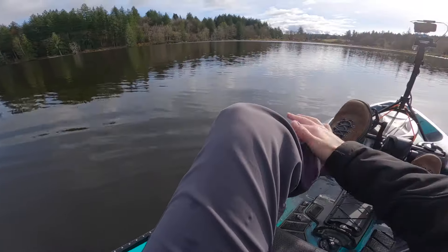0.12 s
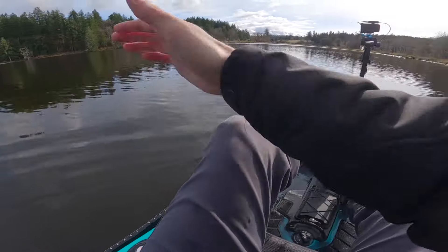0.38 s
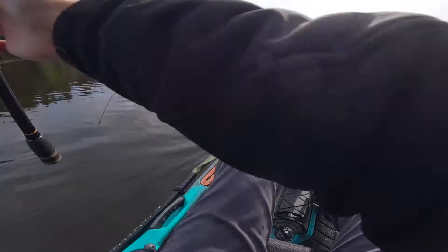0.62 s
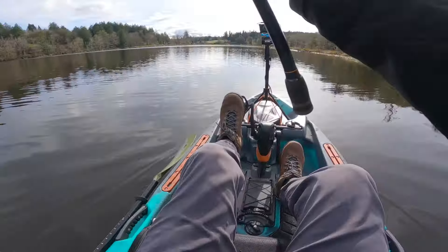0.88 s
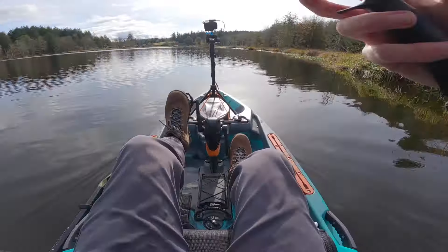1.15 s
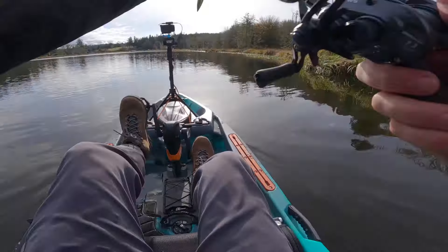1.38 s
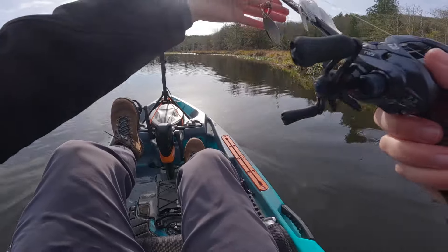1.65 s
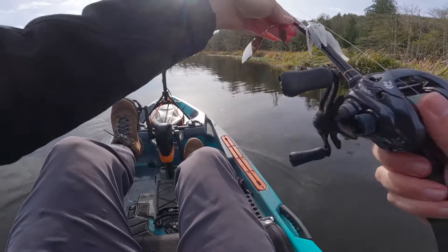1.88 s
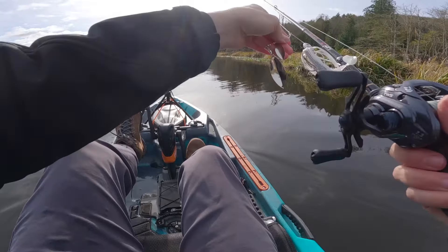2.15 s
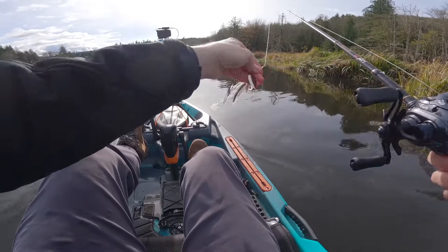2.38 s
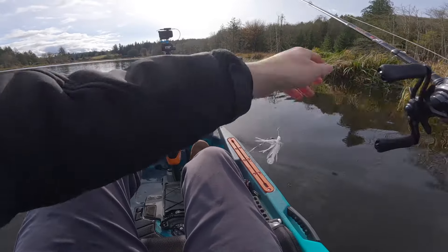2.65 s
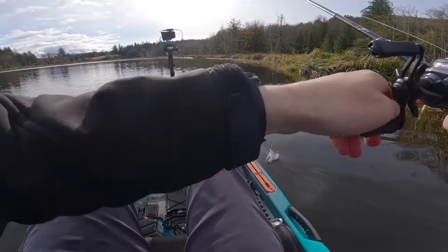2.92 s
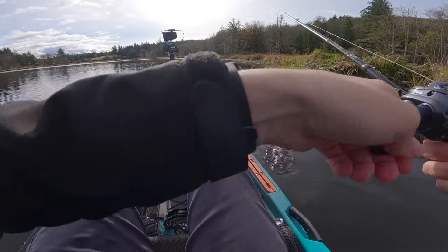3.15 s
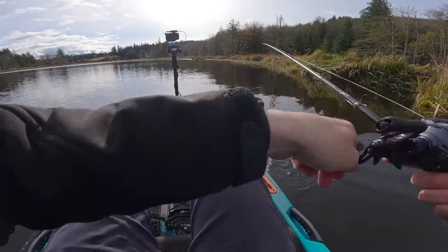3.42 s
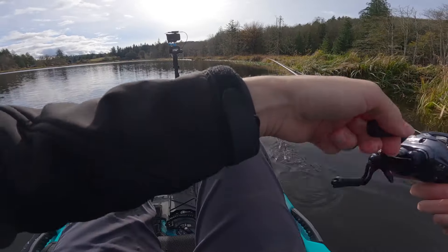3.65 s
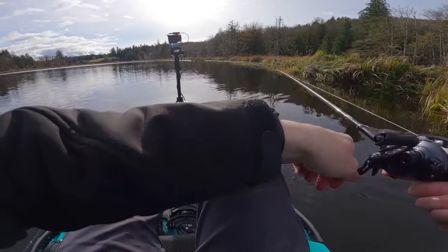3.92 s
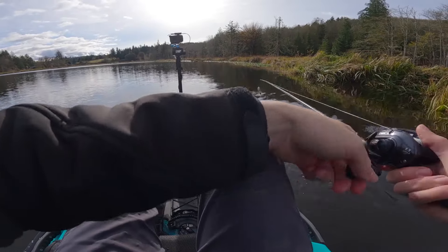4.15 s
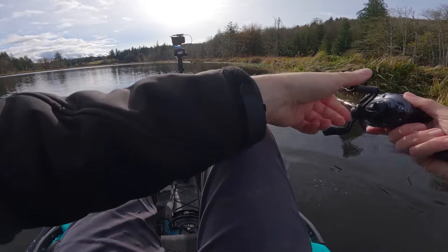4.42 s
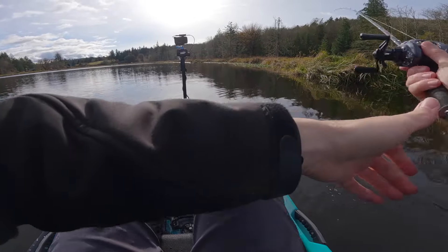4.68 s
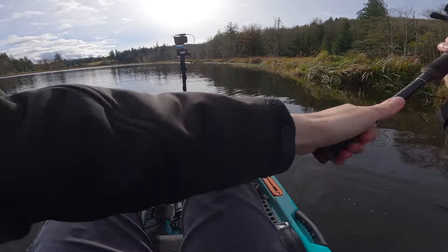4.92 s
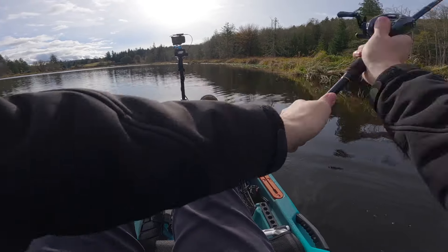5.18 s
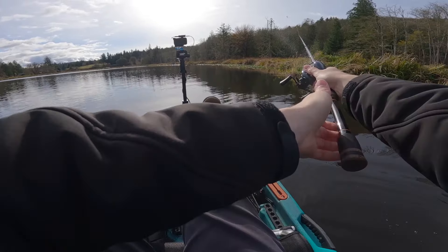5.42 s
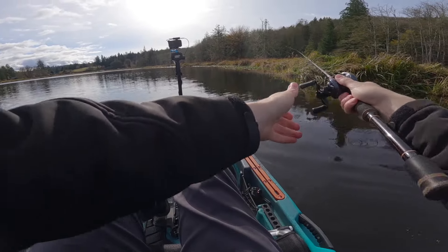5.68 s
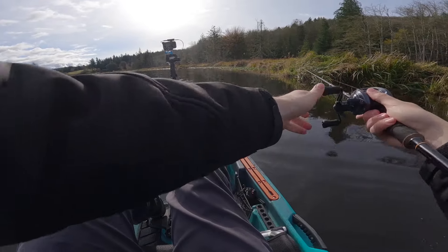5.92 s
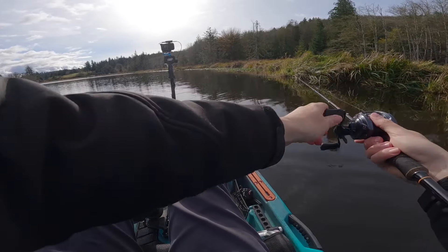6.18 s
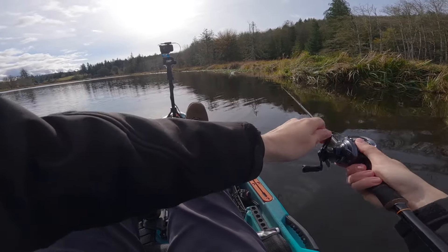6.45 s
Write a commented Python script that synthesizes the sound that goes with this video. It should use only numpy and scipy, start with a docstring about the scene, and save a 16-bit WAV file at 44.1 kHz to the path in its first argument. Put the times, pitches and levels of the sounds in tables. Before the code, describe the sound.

A quiet open lake, close and dry from the chest, centred, with barely audible air. Soft hollow knocks at 0-0.4 s accompany faint blade tinkles; sleeve rustle and low hull rumble surge from 0.25 to 1.6 s, with a soft low hum from 0.65 s and a light reel whirr near 1.2. At 1.72 a thin bright blade rings, then a very sharp clack at 1.92. Sparse delicate tinkles follow at 2.1-2.8. From 3.03 to 3.25 clicks, rattle and knocks crowd together, the loudest snap at 3.22; grainy winding whirr swells around 3.3 and 3.6, with a faint high squeal and dull handle knocks to 4.4. A brief scrape, a solid clack at 4.55 and bright jingles at 4.65-4.73 lead to a sleeve swish peaking at 5.2-5.4. Spool whirr swells at 5.55, a faint ring at 5.8, then it fades into light rustle and small clicks near 6.4.

```python
"""Soft knocks on rod and hull, then rubbing jacket sleeves and clicks: an angler in a kayak on a still lake
frees a bladed lure, winds in and casts again, heard from the chest. Sleeves and lake air are coloured noise,
the hum and the squeal of line are wavering sines; scraping noise rings the reel housing as a whirr.
Contact noise rings the reel body in clicks, handle turns knock hull modes, and
the lure's two thin blades tinkle as decaying plate modes."""
import sys
import numpy as np
from scipy import signal
from scipy.fft import rfft, irfft, next_fast_len
from scipy.io import wavfile
from scipy.ndimage import uniform_filter1d

SR = 44100
rng = np.random.default_rng(int(sys.argv[2]) if len(sys.argv) > 2 else 0)


def put_to_file(sound):
    """Save the sound as 16-bit audio at rate SR, in the file named by the first command-line argument."""
    columns = np.atleast_2d(sound).T  # one column per channel
    safe = np.clip(columns, -1, 1)
    whole_steps = np.round(safe * 32767)
    wavfile.write(sys.argv[1], SR, whole_steps.astype(np.int16))


def volts_from_decibels(level):
    """Turn decibel levels (scalar or array-like) into linear amplitude factors."""
    exponent = np.asarray(level, float) / 20
    return 10 ** exponent


N = 289365
LOG_60_DB = np.log(1000)


def curve(table):
    """Columns of a table joined by straight lines in time."""
    s, *columns = np.transpose(table)
    return [np.interp(np.arange(N) / SR, s, c) for c in columns]


def level(x, db):
    """Unit rms, then a gain in dB."""
    return x * volts_from_decibels(db) / np.sqrt(np.mean(x ** 2))


def walk(rate_hz):
    """Random levels held 1 / rate_hz seconds and slewed twice; spread near 2."""
    hold = int(SR / rate_hz)
    steps = np.repeat(rng.standard_normal(N // hold + 1), hold)
    return 2.52 * uniform_filter1d(uniform_filter1d(steps, hold), hold)[:N]


def decay(t, t60_s):
    """Exponential decay by 60 dB in t60_s."""
    return np.exp(-LOG_60_DB * t / t60_s)


def peaks(hz, table):
    """Complex response of a sum of resonances."""
    return sum(volts_from_decibels(db) * 1j * hz * w / (f ** 2 - hz ** 2 + 1j * hz * w) for f, w, db in table)


def hiss(points, flicker_db, rate_hz, grain_db):
    """Coloured grainy noise of unit rms in octave bands, each of which flickers on its own."""
    hz = np.arange(N // 2 + 1) * SR / N + 1
    point_hz, point_db = np.transpose(points)
    colour = volts_from_decibels(np.interp(np.log(hz), np.log(point_hz), point_db))
    grain = volts_from_decibels(grain_db * np.minimum(rng.exponential(size=N), 6))
    spectrum = rfft(rng.standard_normal(N) * grain) * colour
    octave = np.log2(hz / 20)
    out = np.zeros(N)
    for k in range(11):
        window = np.cos(np.pi / 2 * np.clip(octave - k, -1, 1)) ** 2
        out += irfft(spectrum * window, N) * volts_from_decibels(flicker_db * walk(rate_hz))
    return level(out, 0)


def tone(table, waver_db, rate_hz):
    """A sine that follows a pitch and rms level table with a wavering level, silent outside it."""
    hz, db = curve(table)
    t = np.arange(N) / SR
    on = np.clip(np.minimum(t - table[0][0], table[-1][0] - t) / 0.024, 0, 1)
    gain = np.sqrt(2) * on * volts_from_decibels(db + waver_db * walk(rate_hz))
    return gain * np.sin(2 * np.pi * np.cumsum(hz) / SR)


def swells(s, db, rise_s, fall_s):
    """Gain that climbs to peaks and dies away at steady rates, 20 dB per rise or fall, summed by power."""
    late = np.arange(N) / SR - np.array(s)[:, None]
    below = 20 * np.maximum(late / np.array(fall_s)[:, None], -late / np.array(rise_s)[:, None])
    return np.sqrt((volts_from_decibels(np.array(db)[:, None] - below) ** 2).sum(axis=0))


def whirr(modes):
    """Uneven scraping rings a housing; the grip shifts which resonances sound and bends them a little."""
    roughness_db = 3.0 * np.minimum(rng.exponential(size=N), 4) + 1.5 * walk(120)
    scrape = rfft(rng.standard_normal(N) * volts_from_decibels(roughness_db))
    hz, out = np.arange(N // 2 + 1) * SR / N, np.zeros(N)
    for f, w, db in modes:
        mode = irfft(scrape * peaks(hz, [(f, w, 0)]) ** 2, N)
        ring = signal.hilbert(mode, next_fast_len(N))[:N]
        bend_hz, grip_db = .008 * min(f, 5000) * walk(5), .8 * walk(18)
        out += volts_from_decibels(db + grip_db) * np.real(ring * np.exp(2j * np.pi * np.cumsum(bend_hz) / SR))
    return level(out, 0)


def add(out, s, sound, db):
    """Mix a sound in at time s with its peak at db."""
    i = int(s * SR)
    out[i:i + len(sound)] += (sound * volts_from_decibels(db) / np.abs(sound).max())[:N - i]


# Noise colour of lake air. Each row: frequency in Hz, relative level in dB.
AIR_COLOUR = [(24, -43.5), (40, -1), (123, 5), (260, -12), (388, -11), (1530, -25), (5070, -45),
              (6190, -25.5), (15600, -26.5)]


def lake_air():
    """Faint, slowly flickering broadband noise."""
    return volts_from_decibels(-60) * hiss(AIR_COLOUR, flicker_db=.5, rate_hz=8, grain_db=.1)


# Low tone. Each row: time in seconds, pitch in Hz, rms level in dB.
HUM_TRACK = [(.63, 121.9, -59), (.7, 179.6, -46.5), (.75, 153, -48), (.8, 141.1, -57), (1.05, 147, -56),
             (1.6, 143.9, -55), (2.25, 140.9, -60.5), (2.35, 140, -69), (2.6, 138.2, -79)]
# Low thud under its first swell. Each row: time in seconds, pitch in Hz, rms level in dB.
THUD_TRACK = [(.65, 80, -62), (.72, 87, -51.5), (.79, 96, -63)]


def hum():
    """A soft low sine that swells once, holds and fades, with a thud below it."""
    return tone(HUM_TRACK, waver_db=.8, rate_hz=10) + tone(THUD_TRACK, waver_db=.8, rate_hz=10)


# Line on a guide. Each row: time in seconds, pitch in Hz, rms level in dB.
SQUEAL_TRACK = [(3.3, 11980, -74), (3.426, 13400, -68), (3.56, 13782, -72)]


def line_squeal():
    """A thin rising sine, the faint squeal of running line on a guide."""
    return tone(SQUEAL_TRACK, waver_db=1.5, rate_hz=60)


# The angler's movement. Each row: time in seconds, sleeve rub level in dB, hull rumble level in dB.
MOVEMENT = [(0, -63.5, -53), (.22, -54.5, -50), (.245, -48, -62), (.5, -42, -51), (.64, -43, -47.5),
            (1.03, -42.5, -52.5), (1.2, -47, -48.5), (1.62, -48.5, -54.5), (1.73, -58.5, -59.5),
            (2.1, -59.5, -63.5), (2.97, -63, -65), (3.25, -57.5, -53.5), (4.02, -68, -61.5),
            (4.5, -68, -54), (5.1, -55.5, -60), (5.3, -60, -54.5), (5.5, -51, -55.5), (6.25, -62.5, -62)]


def movement():
    """Gains of sleeve rub and hull rumble as the body moves."""
    return [volts_from_decibels(db) for db in curve(MOVEMENT)]


# Noise colour of the hull. Each row: frequency in Hz, relative level in dB.
RUMBLE_COLOUR = [(30, -50), (70, -7), (200, 0.5), (400, -1.5), (700, -15), (1400, -40)]


def hull_rumble():
    """Shifting weight rumbles through the hull as low noise."""
    _, hull_gain = movement()
    return hull_gain * hiss(RUMBLE_COLOUR, flicker_db=2.0, rate_hz=31, grain_db=1.0)


# Pushes on the reel. Each row: peak time in seconds, whirr level in dB, rise and fall in seconds per 20 dB.
REEL_PUSHES = [(1.22, -55.5, 0.09, 0.52), (3.3, -51, 0.098, 2), (3.62, -51.5, 0.31, 0.39),
               (4.01, -64, 0.072, 0.35), (4.278, -57.5, 0.1, 0.47), (5.56, -52.5, 0.42, 0.55),
               (5.9, -58, 0.36, 0.88)]


def reel_drive():
    """Whirr gain: each push swells the reel, which then runs down."""
    return swells(*np.transpose(REEL_PUSHES))


# Dull rub of sleeves and line. Each row: frequency in Hz, relative level in dB.
RUB_COLOUR = [(200, -0.5), (500, 5.5), (1200, 2), (2500, 1), (4500, -1), (7000, -12), (12000, -37)]
# Fine hiss of sleeves. Each row: frequency in Hz, relative level in dB.
FINE_COLOUR = [(2000, -11.5), (4000, -4), (8000, 0.5), (12000, -2.5), (16000, -6)]
# Quick arm sweeps. Each row: peak time in seconds, rub level in dB, fine hiss level in dB,
# rise and fall in seconds per 20 dB.
ARM_SWEEPS = [(2.5, -66, -53.5, 0.25, 0.093), (3.09, -54.5, -54.5, 0.22, 0.045),
              (4.91, -63.5, -56.5, 0.15, 0.1), (5.22, -44, -46.5, 0.2, 0.12),
              (5.363, -39.5, -40.5, 0.1, 0.13), (6.42, -54.5, -58, 0.12, 0.11)]


def sleeves_and_line():
    """Sleeves, line and handle rub dully; sleeves also hiss finely."""
    slow, _ = movement()
    s, rub_db, fine_db, rise_s, fall_s = np.transpose(ARM_SWEEPS)
    line = volts_from_decibels(-4.5) * reel_drive()
    rub_gain = np.sqrt(slow ** 2 + line ** 2 + swells(s, rub_db, rise_s, fall_s) ** 2)
    fine_gain = np.hypot(volts_from_decibels(-2.5) * slow, swells(s, fine_db, rise_s, fall_s))
    rub = rub_gain * hiss(RUB_COLOUR, flicker_db=0.83, rate_hz=30, grain_db=1.5)
    return rub + fine_gain * hiss(FINE_COLOUR, flicker_db=1.05, rate_hz=43, grain_db=3.0)


# Drag resonances. Each row: frequency in Hz, width in Hz, relative level in dB.
DRAG_MODES = [(657, 520, -1), (1290, 97, -2)]
# One entry: start in seconds, end in seconds, rms level in dB.
DRAG_TIME = (4.4, 4.545, -59)


def drag():
    """A dull scrape before the spool is freed."""
    t = np.arange(N) / SR
    start_s, end_s, db = DRAG_TIME
    fade = np.clip(np.minimum(t - start_s, end_s - t) / 0.014, 0, 1)
    return volts_from_decibels(db) * fade * whirr(DRAG_MODES)


# Housing at first. Each row: frequency in Hz, width in Hz, relative level in dB.
GEAR_MODES = [(2250, 380, 7), (3200, 700, 2), (4290, 710, 1.5), (5300, 560, 0)]
# Housing once the handle turns steadily. Each row: frequency in Hz, width in Hz, relative level in dB.
LOADED_MODES = [(2090, 320, 7), (2710, 440, 4), (3460, 410, -0.5), (5270, 480, -1.5)]
# Free-running once the spool is released. Each row: frequency in Hz, width in Hz, relative level in dB.
SPOOL_MODES = [(620, 580, 4), (1335, 110, 5), (2050, 470, -2.5), (3050, 240, 5), (2560, 170, 4),
               (4250, 310, -2), (4960, 420, 3.5), (13400, 600, -4), (15000, 770, -5)]


def reel_whirr():
    """Gear teeth scrape the housing while winding; spool and line run from the spool's release on."""
    t = np.arange(N) / SR
    loaded_s, release_s = 3.55, 4.6
    winding = [whirr(GEAR_MODES), whirr(LOADED_MODES)]
    return reel_drive() * np.select([t < loaded_s, t < release_s], winding, whirr(SPOOL_MODES))


# Fingers on loose parts. Each row: start in seconds, end in seconds, peak of the loudest ticks in dB.
FUMBLES = [(2.241, 2.266, -42), (3.031, 3.197, -44), (3.507, 3.544, -53), (4.647, 4.674, -41)]


def rattle():
    """Scattered tiny decaying sines, each at a pitch of its own."""
    out, t = np.zeros(N), np.arange(256) / SR
    ticks_per_s = 1600
    for start_s, end_s, db in FUMBLES:
        span_s = end_s - start_s
        for when, pitch, softness in rng.random((int(span_s * ticks_per_s), 3)):
            hz = 1800 * 7 ** pitch ** 1.5
            tick = decay(t, 0.0069) * np.sin(2 * np.pi * hz * t)
            add(out, start_s + when * span_s, tick, db - 14 * softness)
    return out


# Blows to rod and hull. Each row: time in seconds, peak of the ring in dB, favoured pitch in Hz.
KNOCK_HITS = [(0.024, -37, 228), (0.102, -34.5, 254), (0.273, -33, 198), (0.323, -36, 218),
              (0.391, -36.5, 218), (1.117, -38, 216), (2.53, -47, 490), (3.065, -29.5, 420),
              (3.09, -39, 232), (3.144, -39, 617), (3.18, -28, 383), (3.496, -31, 490), (3.504, -31, 183),
              (3.511, -37, 1480), (3.526, -36, 1480), (3.523, -41.5, 260), (3.66, -31, 295),
              (3.799, -32, 272), (3.845, -31, 175), (4.052, -34, 277), (4.186, -36.5, 266.6),
              (4.331, -40, 271.5), (4.356, -28, 208), (4.55, -27, 174), (4.59, -41.5, 264),
              (4.711, -42, 405), (6.482, -44, 620)]
# Hull modes. Each row: frequency in Hz before a small random shift, t60 in seconds.
HULL_MODES = [(85, 0.16), (130, 0.066), (180, 0.078), (250, 0.11), (320, 0.051), (390, 0.12), (470, 0.091),
              (600, 0.057), (780, 0.09), (1050, 0.017), (1480, 0.039)]


def knocks():
    """A blunt blow rings hull modes near its pitch, low ones arriving late; loose gear buzzes along."""
    out, t = np.zeros(N), np.arange(SR // 4)[:, None] / SR
    hz, t60_s = np.transpose(HULL_MODES)
    buzz_colour = [(200, -15), (600, 3.5), (1500, -5), (3000, -29.5)]  # Hz, dB
    buzz = hiss(buzz_colour, flicker_db=2.0, rate_hz=140, grain_db=1.5)
    chances = rng.standard_normal((len(KNOCK_HITS), 2, len(HULL_MODES)))
    rise = (1 - np.exp(-t * hz / 0.54)) ** 2
    for (s, db, pitch_hz), (level_chance, pitch_chance) in zip(KNOCK_HITS, chances):
        weight = volts_from_decibels(-11 * np.abs(np.log2(hz / pitch_hz)) + 2.0 * level_chance)
        ring = np.sin(2 * np.pi * hz * (1 + 0.043 * pitch_chance) * t + 3 * pitch_chance)
        add(out, s, (weight * rise * decay(t, t60_s) * ring).sum(axis=1), db)
        shake = buzz[int(s * SR):][:len(t)]
        add(out, s, shake * decay(t[:len(shake), 0], 0.06), db - 4)
    return out


# Reel and tackle. Each row: time in seconds, body peak in dB, strongest pitch in Hz, edge re body peak in dB.
CLICK_HITS = [(0.1039, -40.5, 2140, -24), (0.9486, -33, 2600, -2), (1.849, -31.5, 2520, -6),
              (1.8926, -45, 5380, 2), (1.917, -7, 3500, 0.5), (1.919, -18.5, 2610, 12),
              (1.951, -21.5, 3220, -9), (1.9595, -26.5, 4360, -4.5), (2.2476, -39, 1840, -25),
              (2.29, -40.5, 2620, -12), (2.7684, -33, 6030, -4.5), (3.0382, -35.5, 4500, -10),
              (3.067, -24.5, 2560, -12), (3.1458, -33.5, 4970, -9), (3.172, -33, 2370, -6),
              (3.181, -23, 3400, -17), (3.189, -24.5, 2430, -5), (3.1938, -14.5, 2440, -8),
              (3.2199, -7, 4960, -5.5), (3.238, -35, 2300, -30), (3.26, -30, 2290, -25),
              (3.4984, -25, 1980, -8.5), (3.6056, -35.5, 2570, -16), (3.6618, -38, 5060, -12),
              (3.795, -36.5, 4080, -20), (3.8421, -28.5, 1990, -6), (4.358, -24, 1750, -11.5),
              (4.5463, -13.5, 3300, -3.5), (4.646, -44, 2400, -21), (4.646, -50, 5400, -20),
              (4.783, -43, 2300, -20), (5.3797, -20.5, 1942, -36), (5.378, -26.5, 4800, -30),
              (6.057, -56, 5000, 12), (6.415, -41, 5000, -3), (6.4309, -38, 2440, -2),
              (6.529, -36, 2530, -37)]
# Body resonances. Each row: frequency in Hz, width in Hz, level in dB, before the response is squared.
BODY_MODES = [(955, 970, 0.5), (2300, 170, 3), (3030, 340, 0), (4640, 1300, -1)]
# Edge resonances. Each row: frequency in Hz, width in Hz, level in dB, before the power of 1.3.
EDGE_MODES = [(7680, 190, 13.5), (9000, 820, 9), (10270, 1500, 7), (14900, 1500, -23.5)]


def clicks():
    """A few ms of hard contact noise rings the reel body, which leaves a weak tail; a treble edge is brief."""
    out, t = np.zeros(N), np.arange(2048) / SR
    hz = np.arange(1025) * SR / 2048
    contact = (1 - np.exp(-t / .0004)) * decay(t, .009)
    body_envelope = contact + volts_from_decibels(-15) * decay(t, 0.032)
    edge_envelope = contact + volts_from_decibels(-24.0) * decay(t, 0.01)
    body_response = np.abs(peaks(hz, BODY_MODES)) ** 2
    edge_response = np.abs(peaks(hz, EDGE_MODES)) ** 1.3
    noises = rng.standard_normal((len(CLICK_HITS), 2048))
    for (s, db, pitch_hz, edge_db), noise in zip(CLICK_HITS, noises):
        tilt = volts_from_decibels(-3.0 * np.abs(np.log2((hz + 1) / pitch_hz)))
        colour = tilt * body_response + np.abs(peaks(hz, [(pitch_hz, 600, 2.5)])) ** 2
        add(out, s, body_envelope * irfft(rfft(noise) * colour), db)
        add(out, s, edge_envelope * irfft(rfft(noise) * edge_response), db + edge_db)
    return out


def tinkle(t, hz, db, t60_s, phase):
    """Decaying plate modes after a short contact."""
    ring = volts_from_decibels(db) * decay(t, t60_s) * np.sin(2 * np.pi * (hz * t + phase))
    return ((1 - np.exp(-t / 0.000074)) * ring).sum(axis=1)


# Small blade. Each row: time in seconds, base level in dB (raised by the stronger mode boost),
# main pitch in Hz, low mode boost in dB, middle mode boost in dB.
SMALL_STRIKES = [(0.1857, -51, 14400, 10, -2), (0.317, -37, 13700, 0, 8), (1.717, -32, 14400, 1, 3),
                 (1.743, -34, 14000, -8, -7), (2.1, -43.5, 14230, 16, 3), (2.174, -43, 14200, 5, 0),
                 (2.2293, -39, 14700, -12, 1), (2.58, -51, 14500, -4, -4), (2.602, -42, 14100, 11.5, 10.5),
                 (2.6106, -43.5, 14200, 17.5, 11), (2.634, -36.5, 14100, 2.5, 0.5),
                 (2.785, -50.5, 14100, 12.5, 5), (2.7985, -39, 14500, -14, 0),
                 (2.822, -48, 14300, -19, -15), (1.38, -44, 14400, -15, -10), (.83, -47, 14250, -15, -15),
                 (4.654, -42.5, 14100, -20.5, -2), (4.663, -22.5, 14200, -16, -2)]
# Plate modes. Each row: multiple of main pitch, level before boost in dB, t60 in seconds.
SMALL_MODES = [(0.353, -11.5, 0.048), (0.502, 0.5, 0.054), (.712, 7.5, 0.016), (0.776, 5.5, 0.03),
               (1.001, 11, 0.053), (1.08, -2, 0.031)]


def small_blade():
    """Short tinkles that chatter against the wire, damped by the fingers and the skirt."""
    out, t = np.zeros(N), np.arange(SR // 6)[:, None] / SR
    multiple, mode_db, t60_s = np.transpose(SMALL_MODES)
    phases = rng.random((len(SMALL_STRIKES), len(SMALL_MODES)))
    for (s, db, hz, low_db, middle_db), phase in zip(SMALL_STRIKES, phases):
        struck_db = mode_db + np.select([multiple < .6, multiple < .9], [low_db, middle_db], 0)
        add(out, s, tinkle(t, hz * multiple, struck_db, t60_s, phase), db + max(low_db, middle_db, 0))
    return out * volts_from_decibels(2.0 * walk(300))


# Rings and later swells of the large blade; wet, it rings lower. Each row: onset time in seconds, peak in dB,
# main pitch in Hz, side mode boost in dB (doubled below the main pitch), beat or swell period in seconds,
# phase at onset in periods.
BIG_RINGS = [(.1855, -48, 9500, 0, 0.17, .02), (1.719, -19, 9370, 0, 0.036, 0.018),
             (2.1, -32, 9320, 6.5, 0.18, .02), (2.174, -42, 9500, 0, 0.069, 0.017),
             (2.188, -36, 9400, -9, 0.13, 0.58), (2.23, -51, 9395, -1, 0.089, .02),
             (2.579, -40.5, 9400, -23, 0.05, 0.016), (4.727, -23, 9320, -8, 0.0165, 0.69),
             (5.807, -40, 9000, 10.5, 0.13, .02), (1.755, -25.5, 9380, -23, 0.077, 0.45),
             (5.934, -45, 9000, 17, 0.055, .02), (5.761, -48, 9050, 19, 0.044, .02)]
# Plate modes. Each row: multiple of main pitch, level before boost in dB, t60 in seconds.
BIG_MODES = [(0.354, -14, 0.056), (.638, -26.5, .4), (.755, -7.5, .17), (1, 7.5, .3), (1.316, -1.5, .25),
             (1.531, -20, 0.17), (1.674, -12, 0.14)]


def big_blade():
    """Plate modes ring long, their level beating and swelling."""
    out, t = np.zeros(N), np.arange(SR // 3)[:, None] / SR
    multiple, mode_db, t60_s = np.transpose(BIG_MODES)
    phases = rng.random((len(BIG_RINGS), len(BIG_MODES)))
    for (s, db, hz, side_db, period_s, onset), phase in zip(BIG_RINGS, phases):
        ring_db = mode_db + np.select([multiple > 1, multiple < 1], [side_db, 2 * side_db], 0)
        beat = 1 - .75 * np.sin(np.pi * (t[:, 0] / period_s + onset)) ** 2
        add(out, s, tinkle(t, hz * multiple, ring_db, t60_s, phase) * beat, db)
    return out


def scene():
    """All sources lie in the middle."""
    background = lake_air() + hum() + line_squeal()
    angler = hull_rumble() + sleeves_and_line()
    reel = drag() + reel_whirr() + clicks()
    mono = background + angler + reel + rattle() + knocks() + small_blade() + big_blade()
    return np.array([mono, mono])


def band_limit(x):
    """A steep low-pass at the top of the band."""
    return signal.sosfilt(signal.butter(12, 16790, fs=SR, output="sos"), x)


def record(dry):
    """Cuts the top; adds a faint smeared copy and a trace of low noise, of opposite sign in the two channels."""
    top_hz = 15750
    dry = signal.sosfilt(signal.ellip(6, .3, 24, top_hz, fs=SR, output="sos"), dry)
    smear = irfft(volts_from_decibels(np.linspace(0, 6.0, 257)) * np.exp(2j * np.pi * rng.random(257)))
    copy = volts_from_decibels(-33.5) * signal.fftconvolve(dry[0], smear, mode="same")
    side_noise_colour = [(25, 2), (120, -14), (400, -30.5)]  # Hz, dB
    side_noise = volts_from_decibels(-89) * hiss(side_noise_colour, flicker_db=1.5, rate_hz=8, grain_db=.1)
    mix = dry + (copy + side_noise) * np.array([[1], [-1]])
    return band_limit(mix)


dry = scene()
out = record(dry)
put_to_file(out)
```